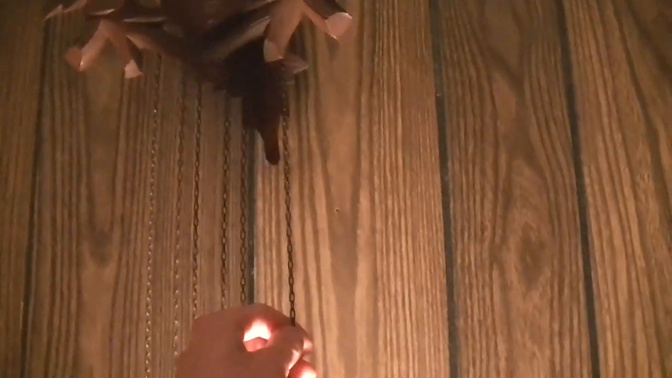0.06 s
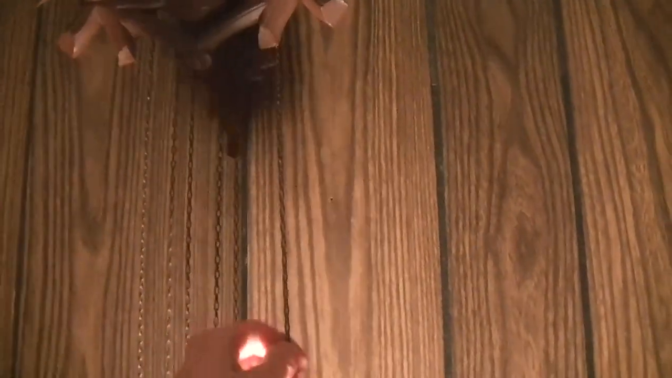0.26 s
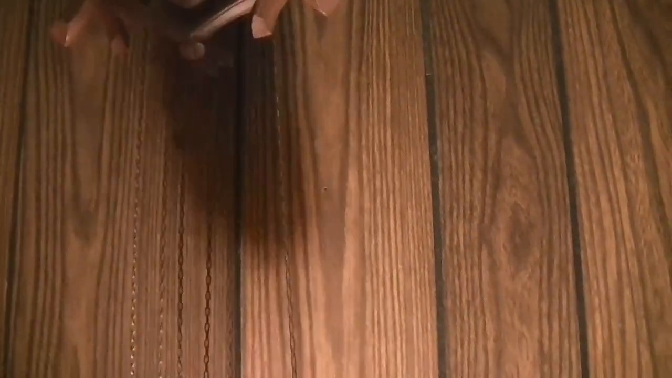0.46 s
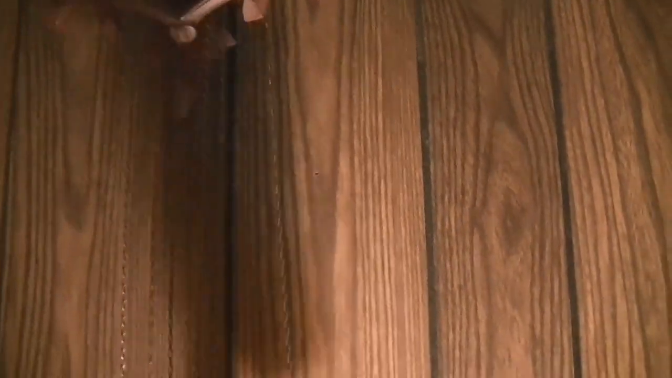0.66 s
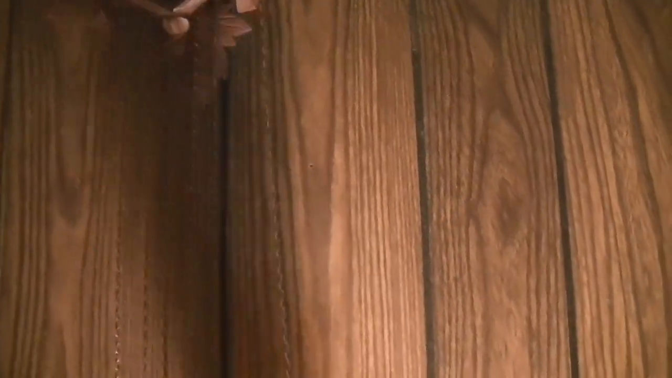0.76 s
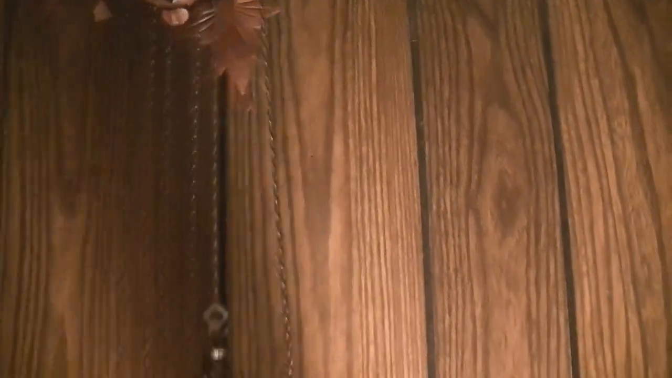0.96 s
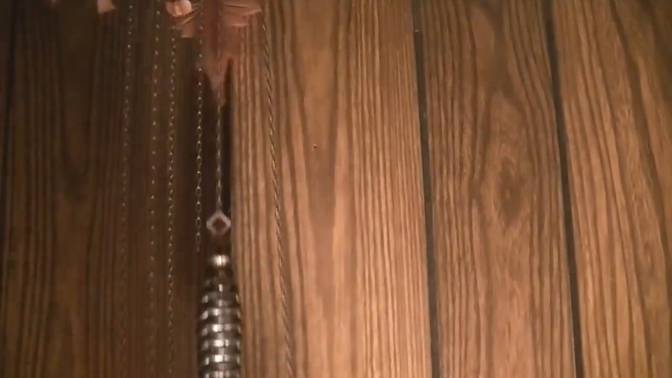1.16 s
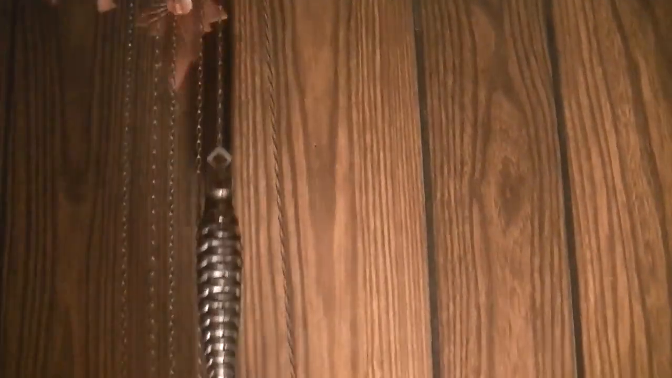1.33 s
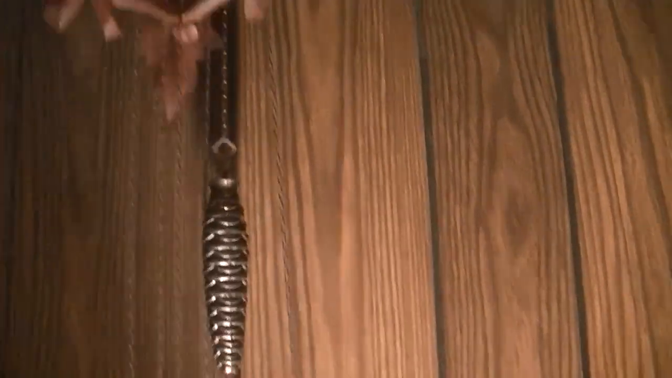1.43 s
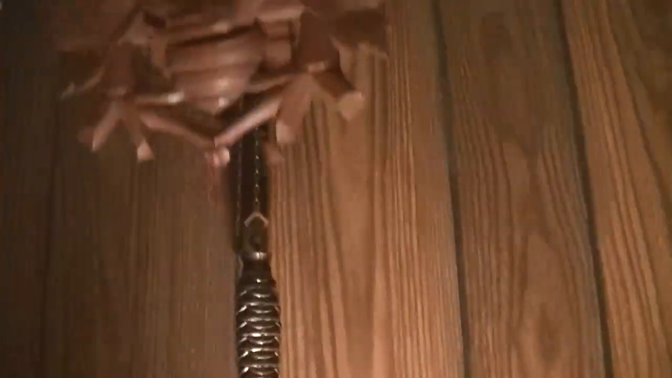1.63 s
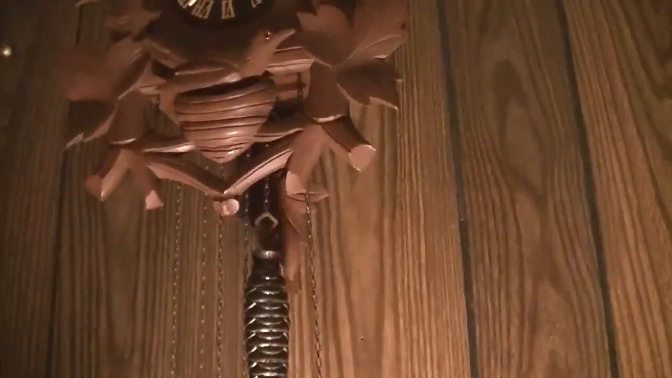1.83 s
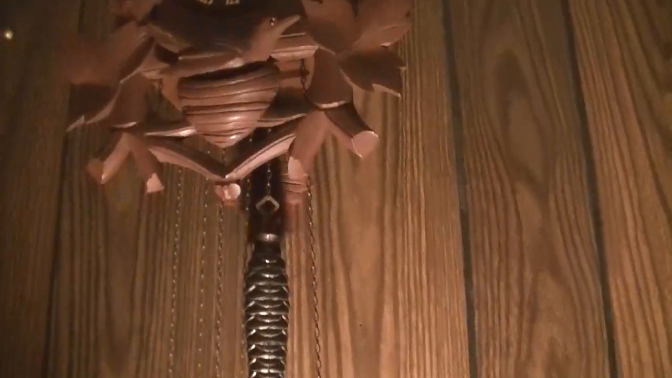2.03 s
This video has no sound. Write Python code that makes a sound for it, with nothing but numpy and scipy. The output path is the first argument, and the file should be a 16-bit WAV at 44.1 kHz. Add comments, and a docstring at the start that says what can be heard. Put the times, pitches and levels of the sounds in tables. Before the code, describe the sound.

Rapid ratchet clicking of a clock being wound by its chain, easing off into quiet

```python
"""In a small panelled room, a wall clock is wound by pulling its weight chain.
The pawl snaps over the ratchet teeth, soon at a rapid rate, then slower; decaying modes ring pawl, wheel and case.
Shaped noise bursts add metallic crack and wooden knock; short partials make the chain links clink over a rustle.
The chain tightens with a knock, clunks as it jerks and rustles softly once let go.
A short noise tail answers as the room, over still air, heard close and almost in mono."""
import sys
import numpy as np
from scipy import signal
from scipy.fft import rfft, irfft, next_fast_len
from scipy.io import wavfile
from scipy.ndimage import map_coordinates

SR = 44100
rng = np.random.default_rng(int(sys.argv[2]) if len(sys.argv) > 2 else 0)


def to_wav(s):
    """Save 16-bit WAV."""
    ch = np.atleast_2d(s).T  # columns
    pcm = np.round(np.clip(ch, -1, 1) * 32767)  # PCM
    wavfile.write(sys.argv[1], SR, pcm.astype(np.int16))


N = 92610
TOP_HZ = 16000
RING_S = np.arange(SR // 5) / SR  # time axis of one struck sound
CHATTER_S = 0.0021
MODE_SCATTER_DB, CASE_DETUNE = 2.5, 0.008  # detune as a fraction of the pitch
CASE_ATTACK_S = 0.0045

# pawl snaps: start_s [s], pawl_db [dB], pawl_pitch_hz [Hz], crack_db [dB], case_db [dB]
TOOTH_SNAPS = [(0.214, -15.5, 2540, -25.5, -30.5), (0.2588, -11.5, 2680, -24.5, -30.5),
               (0.2905, -18, 2640, -23.5, -29), (0.3134, -15, 2700, -25, -29.5),
               (0.3322, -14.5, 2780, -21, -34.5), (0.349, -20, 2480, -23, -29),
               (0.3624, -16, 2660, -25, -24.5), (0.3765, -14, 2420, -20, -26),
               (0.3904, -14, 2460, -20, -27), (0.403, -19, 2600, -21, -27.5),
               (0.4169, -19, 2400, -20.5, -27.5), (0.4308, -12.5, 2580, -22, -26.5),
               (0.444, -20, 2540, -22.5, -27), (0.4579, -21, 2450, -27.5, -29),
               (0.472, -18.5, 2460, -21, -26.5), (0.4868, -15.5, 2660, -25, -29),
               (0.5035, -31, 2460, -23, -26), (0.5207, -18.5, 2680, -23.5, -33),
               (0.5349, -21, 2800, -21.5, -28.5), (0.5499, -18, 2540, -24, -35),
               (0.562, -17.5, 2670, -22.5, -26.5), (0.576, -17, 2390, -19.5, -28),
               (0.5882, -18, 2510, -21, -25), (0.6046, -18, 2620, -20, -30.5),
               (0.616, -18.5, 2490, -20.5, -29), (0.6311, -14, 2800, -24.5, -28.5),
               (0.6433, -14.5, 2660, -21.5, -31), (0.6571, -23, 2380, -23.5, -27),
               (0.6718, -11, 2670, -24, -27), (0.6873, -14, 2780, -20, -29), (0.703, -20, 2580, -26, -27),
               (0.7195, -13.5, 2750, -22, -30), (0.7341, -13, 2850, -20, -34),
               (0.7488, -17, 2610, -26, -26), (0.7613, -17, 2620, -21.5, -27),
               (0.7763, -14.5, 2450, -20, -29.5), (0.7891, -17, 2400, -19.5, -32),
               (0.8044, -15.5, 2750, -21, -29), (0.8192, -19, 2320, -22, -31),
               (0.8361, -17.5, 2590, -21.5, -26), (0.8508, -17, 2790, -25, -30),
               (0.8678, -20.5, 2350, -22, -26.5), (0.885, -23, 2750, -25, -27),
               (0.9045, -13, 2670, -23.5, -31), (0.9287, -29, 2540, -22.5, -28.5),
               (0.9529, -15.5, 2720, -25.5, -29), (0.9763, -17.5, 2850, -21.5, -26),
               (0.9986, -27, 2570, -26, -37), (1.0182, -20, 2420, -22, -25), (1.0399, -14, 2580, -21, -30),
               (1.059, -18, 2310, -23, -28.5), (1.0794, -17.5, 2640, -22.5, -26.5),
               (1.0951, -19, 2380, -21.5, -32), (1.1142, -15, 2600, -24.5, -27),
               (1.1306, -20, 2540, -23.5, -27), (1.1487, -20.5, 2480, -22, -28),
               (1.1671, -16.5, 2660, -24.5, -26.5), (1.189, -15.5, 2600, -21.5, -32),
               (1.2126, -21, 2580, -24.5, -28.5), (1.2356, -15.5, 2720, -24, -26),
               (1.255, -17, 2700, -25.5, -30), (1.2746, -22, 2520, -24, -27.5),
               (1.291, -33, 2560, -20.5, -24.5), (1.3099, -27, 2360, -22.5, -25),
               (1.3262, -23, 2400, -20, -26.5), (1.3439, -18.5, 2590, -24, -28),
               (1.3615, -20, 2400, -19.5, -25.5), (1.3806, -16, 2540, -22.5, -31.5),
               (1.3987, -17.5, 2710, -24, -29), (1.4194, -18.5, 2430, -22.5, -26.5),
               (1.4434, -14, 2560, -24.5, -31), (1.4721, -16, 2750, -25.5, -32),
               (1.5114, -20, 2730, -25.5, -27), (1.552, -16, 2760, -25.5, -29.5),
               (1.5812, -17, 2770, -23.5, -27.5), (1.6093, -23, 2420, -24, -28),
               (1.63, -22, 2720, -24, -24.5), (1.654, -21, 2430, -22.5, -27),
               (1.6763, -19, 2410, -21.5, -28.5), (1.7011, -18, 2520, -21.5, -26.5),
               (1.7245, -21, 2660, -21.5, -27), (1.7525, -17, 2640, -21, -27.5),
               (1.7792, -21, 2670, -24, -28.5), (1.8179, -20.5, 2450, -23.5, -29)]
# modes of the wooden case and the frame in it: pitch_hz [Hz], level_db [dB], t60_s [s]
CASE_MODES = [(402.7, -20.5, 0.15), (889, -5, 0.065), (1223, -8.5, 0.07), (1804, 6, 0.028),
              (1878, 6, 0.0083), (3096, -1.5, 0.043), (3430, 2.5, 0.029)]
# dense ringing of the boards: frequency_hz [Hz], relative density_db [dB per Hz]
BOARD_COLOUR = [(30, -24), (150, -54), (225, -7), (330, -8), (520, -19), (630, -7), (850, 3), (1400, 2),
                (1700, -6), (3000, -2), (5000, -9), (15000, -22.5)]
# spectrum of the scraping links: frequency_hz [Hz], relative density_db [dB per Hz]
SCRAPE_COLOUR = [(100, -63), (450, -21.5), (850, -2.5), (1150, -7.5), (2600, -8), (4000, -16.5),
                 (5500, -15.5), (15000, -31)]
# loudness of the running chain: time_s [s], level_db [dB]
CHAIN_LEVEL = [(0, -57), (.1, -52.5), (.17, -50.5), (.21, -43), (.35, -38), (.8, -37), (1.45, -43.5),
               (1.52, -49), (1.8, -41), (1.87, -71), (2.1, -59)]


def amp(db):
    """Decibels to gain."""
    return 10 ** (np.asarray(db) / 20)


def unit(x):
    """Scale to rms 1."""
    return x / np.sqrt(np.mean(x ** 2) + 1e-20)


def along(points, hz):
    """Interpolate (Hz, value) points on a log frequency axis."""
    point_hz, value = np.transpose(points)
    return np.interp(np.log(hz + 1), np.log(point_hz + 1), value)


def level_at(points, s):
    """Gain at a time, from (s, dB) points."""
    return amp(np.interp(s, *np.transpose(points)))


def filtered(x, response):
    """Multiply the spectrum of x by a response of frequency."""
    size = next_fast_len(N + SR // 2)
    return irfft(rfft(x, size) * response(np.fft.rfftfreq(size, 1 / SR)), size)[..., :N]


def noise(colour):
    """Steady coloured noise of rms 1."""
    return unit(filtered(rng.standard_normal(N), lambda hz: amp(along(colour, hz))))


def add(track, s, sound):
    """Mix a sound into the track at a time."""
    part = track[max(round(s * SR), 0):][:len(sound)]
    part += sound[:len(part)]


def decay(t, t60):
    """Exponential fall by 60 dB in t60 seconds."""
    return np.exp(-np.log(1000) * t / t60)


def envelope(attack, t60):
    """A quick rise, a hold while the contact chatters, and an exponential fall."""
    return (1 - np.exp(-RING_S / attack)) * decay(np.maximum(RING_S - CHATTER_S, 0), t60)


def ring(modes, attack, stretch=1, scatter_db=0, detune=0):
    """A struck body: decaying modes of alternating sign, optionally scattered in level and pitch."""
    out = np.zeros(len(RING_S))
    for k, (hz, db, t60) in enumerate(modes):
        gain = (-1) ** k * amp(db + scatter_db * rng.normal())
        pitch_hz = hz * stretch * (1 + detune * rng.normal())
        out += gain * envelope(attack, t60) * np.sin(2 * np.pi * pitch_hz * RING_S)
    return out


def burst(colour, attack, t60, count=3):
    """A body with many close modes: dying noise, pulled back to its colour on every pass."""
    gain = amp(along(colour, np.fft.rfftfreq(len(RING_S), 1 / SR)))
    shape = envelope(attack, t60)
    x = shape * unit(irfft(gain * rfft(rng.standard_normal(len(RING_S)))))
    for _ in range(count):
        phase = np.angle(rfft(x))
        x = irfft(gain * np.exp(1j * phase)) * np.sqrt(shape)
    return unit(x) * np.sqrt(np.mean(shape ** 2))


def clouds(colour, attack, t60, fresh):
    """One burst per tooth: a share of its power is fresh, the rest repeats the same ringing."""
    same = burst(colour, attack, t60)
    return [np.sqrt(1 - fresh) * same + np.sqrt(fresh) * burst(colour, attack, t60, count=1)
            for _ in TOOTH_SNAPS]


def pawl(pitch_hz):
    """The pawl drops off a tooth; all its modes follow the pitch of the snap."""
    # pawl modes at the reference pitch: pitch_hz [Hz], level_db [dB], t60_s [s]
    pawl_modes = [(2406, -8.5, 0.013), (2684, 0, 0.008), (2766, -10.5, 0.031)]
    reference_hz = 2637
    return ring(pawl_modes, 0.00095, pitch_hz / reference_hz)


def wheel():
    """The struck ratchet wheel rings in high modes that vary a little with each snap."""
    # ratchet wheel modes: pitch_hz [Hz], level_db [dB], t60_s [s]
    wheel_modes = [(4478, -12.5, 0.053), (4848, -23, 0.09), (5225, -3.5, .013), (5620, -14.5, .04),
                   (6035, -7, 0.026), (7290, -16.5, 0.029), (8180, -23, 0.036), (10138, -12.5, 0.03),
                   (11950, -13.5, 0.021), (13100, -13, .025), (14150, -25, .018)]
    return ring(wheel_modes, 0.00032, scatter_db=3, detune=0.005)


def metal_cracks():
    """Dense ringing of the metal parts, half of its power new on each tooth."""
    # metal crack spectrum: frequency_hz [Hz], relative density_db [dB per Hz]
    crack_colour = [(500, 0.5), (1500, -6), (2500, -0.5), (3400, 4), (3900, -10.5), (5000, -0.5),
                    (6400, -3.5), (8000, -10), (9700, -3), (10700, -2), (11500, -8.5), (12500, -13.5),
                    (15800, -19.5)]
    return clouds(crack_colour, attack=0.0003, t60=0.031, fresh=0.5)


def recoloured(x):
    """Each tooth colours its crack with random smooth bumps in the spectrum."""
    bump_db, spacing_hz = 2.3, 1100
    position = np.fft.rfftfreq(len(x), 1 / SR) / spacing_hz
    bumps = map_coordinates(rng.standard_normal(len(x)), [position], mode="wrap")
    coloured = irfft(rfft(x) * unit(amp(bump_db * bumps)))
    return coloured * (RING_S < RING_S[-1] / 2)  # drop what the filter wraps to the end


def ratchet():
    """The pawl drops off each tooth and rings itself, the wheel and the case."""
    jitter_s, case_delay_s = 0.00005, 0.001995  # small random timing scatter; lag of the case modes
    crack_trim_db, knock_trim_db = -0.5, 1
    metal, wood = np.zeros((2, N))
    cracks = metal_cracks()
    knocks = clouds(BOARD_COLOUR, attack=0.0048, t60=0.06, fresh=1)
    for (s, pawl_db, pitch_hz, crack_db, case_db), crack, knock in zip(TOOTH_SNAPS, cracks, knocks):
        at = s + jitter_s * rng.normal()
        add(metal, at, amp(pawl_db) * pawl(pitch_hz))
        add(metal, at, amp(crack_db) * (wheel() + amp(crack_trim_db) * recoloured(crack)))
        add(wood, at, amp(case_db + knock_trim_db) * knock)
        case = ring(CASE_MODES, CASE_ATTACK_S, scatter_db=MODE_SCATTER_DB, detune=CASE_DETUNE)
        add(wood, at + case_delay_s, amp(case_db) * case)
    # keep the pawl, wheel and crack sounds free of low thump
    thump_cut = signal.butter(3, 900, "highpass", fs=SR, output="sos")
    return signal.sosfilt(thump_cut, metal) + wood


def clink(count=6):
    """One link strikes the next: a few short partials, pitched anew by each contact."""
    centre_hz, spread_oct, t60_s = 4740, 0.5, 0.0058
    octaves = spread_oct * rng.standard_normal((count, 1))
    hz = np.minimum(centre_hz * 2 ** octaves, TOP_HZ)
    partials = np.sin(2 * np.pi * (hz * RING_S + rng.random((count, 1))))
    return partials.sum(0) * 2 / np.sqrt(count) * decay(RING_S, t60_s)


def chain_rustle():
    """The running chain scrapes in uneven grains, louder as the pawl rides up each tooth."""
    grain_db, grains_per_s, ride_db = 4.5, 400, 6
    t = np.arange(N) / SR
    grains = map_coordinates(rng.standard_normal(N // 10), [t * grains_per_s], mode="wrap")
    snap_s = [row[0] for row in TOOTH_SNAPS]
    up_tooth = np.interp(t, snap_s, np.arange(len(snap_s))) % 1  # 0 to 1 between snaps
    scrape = noise(SCRAPE_COLOUR) * amp(grain_db * grains + ride_db * up_tooth)
    return level_at(CHAIN_LEVEL, t) * unit(scrape)


def chain_ticks():
    """Many small link contacts at random times, following the level of the running chain."""
    ticks_per_s, tick_db, scatter_db = 130, -1, 3.2
    out = np.zeros(N)
    for s in rng.random(round(ticks_per_s * N / SR)) * N / SR:
        gain = level_at(CHAIN_LEVEL, s) * amp(tick_db + scatter_db * rng.normal())
        add(out, s, gain * clink())
    return out


def link_clinks():
    """Single links clink audibly between the snaps and set the case ringing."""
    # single clinks: start_s [s], level_db [dB]
    clink_events = [(0.124, -53), (0.136, -45), (0.164, -45), (0.236, -36), (0.25, -39), (0.274, -30.5),
                    (.321, -23.5), (0.469, -32), (.558, -23.5), (.651, -44), (0.895, -46), (1.054, -37),
                    (1.181, -42), (1.198, -37), (1.284, -31), (1.391, -43), (1.466, -27.5), (1.494, -34.5),
                    (1.603, -38), (1.665, -30), (1.746, -35), (1.765, -35)]
    case_db = -4
    out = np.zeros(N)
    for s, db in clink_events:
        case = ring(CASE_MODES, CASE_ATTACK_S, detune=CASE_DETUNE)
        add(out, s, amp(db) * (clink() + amp(case_db) * case))
    return out


def slack_knock():
    """The hand takes up the slack: the chain knocks in its guide and scrapes."""
    # modes of the chain guide: pitch_hz [Hz], level_db [dB], t60_s [s]
    guide_modes = [(845, -2.5, 0.17), (1887, 6, 0.038), (2450, -5, 0.057), (4770, -10, 0.33)]
    start_s, level_db, scrape_db, attack_s = 0.052, -40, 8, 0.006
    out = np.zeros(N)
    scrape = amp(scrape_db) * burst(SCRAPE_COLOUR, attack_s, t60=0.076)
    add(out, start_s, amp(level_db) * (ring(guide_modes, attack_s) + scrape))
    return out


def chain_clunks():
    """Jerks of the chain shake the frame into dull modes and a clatter of the boards."""
    # modes of the jerked frame: pitch_hz [Hz], level_db [dB], t60_s [s]
    frame_modes = [(487, -7, 0.022), (1070, -8, 0.022), (1335, -1, 0.016), (1540, -4.5, 0.019),
                   (2650, -0.5, 0.0032)]
    # jerks of the chain: start_s [s], level_db [dB]
    jerk_events = [(.38, -35), (0.578, -30), (0.593, -37), (0.781, -27.5), (.793, -28), (1.05, -30),
                   (1.31, -32.5), (1.382, -34), (1.542, -26), (1.565, -34.5), (1.644, -31), (1.666, -29)]
    attack_s, clatter_db = 0.00024, -4.5
    out = np.zeros(N)
    for s, db in jerk_events:
        clatter = amp(clatter_db) * burst(BOARD_COLOUR, attack_s, t60=0.019)
        frame = ring(frame_modes, attack_s, scatter_db=MODE_SCATTER_DB, detune=CASE_DETUNE)
        add(out, s, amp(db) * (frame + clatter))
    return out


def settling():
    """Coloured noise fades in as a soft rustle once the chain is let go."""
    # loudness of the soft rustle: time_s [s], level_db [dB]
    settle_level = [(1.7, -75), (1.82, -55.5), (2.1, -55.5)]
    # its spectrum: frequency_hz [Hz], relative density_db [dB per Hz]
    settle_colour = [(130, -37), (400, -4.5), (1000, 0), (1300, 5), (1600, -6.5), (2400, -4.5), (5000, -27),
                     (15000, -40)]
    return level_at(settle_level, np.arange(N) / SR) * noise(settle_colour)


def chain():
    """All contacts of the chain: the first knock, the run with its jerks, and the settling."""
    running = chain_rustle() + chain_ticks() + link_clinks()
    return slack_knock() + running + chain_clunks() + settling()


def radiated(x):
    """The small case gives off little bass and has a hollow between its lowest modes."""
    leak_db = -16.5  # what also passes unfiltered
    bass_cut = signal.butter(5, 140, "highpass", fs=SR, output="sos")
    hollow = signal.iirnotch(506, 4.4, fs=SR)  # antiresonance: Hz, Q
    return signal.lfilter(*hollow, signal.sosfilt(bass_cut, x)) + amp(leak_db) * x


def room(x):
    """The panelled room's short noise tail builds up gradually and decays by frequency."""
    # reverberation time: frequency_hz [Hz], t60_s [s]
    room_t60 = [(200, 0.21), (600, .5), (1500, 0.051), (4000, 0.2), (12000, 0.078)]
    delay_s, rise_s = 0.011, 0.004
    hz, t, spectrum = signal.stft(rng.standard_normal(SR // 2), SR, nperseg=256)
    shape = (1 - np.exp(-t / rise_s)) * decay(t, along(room_t60, hz)[:, None])
    tail = signal.istft(spectrum * shape, SR, nperseg=256)[1]
    delayed = np.pad(x, (round(delay_s * SR), 0))
    return signal.fftconvolve(delayed, tail / np.linalg.norm(tail))[:N]


def still_air():
    """The quiet background is steady coloured noise."""
    # air spectrum: frequency_hz [Hz], relative density_db [dB per Hz]
    air_colour = [(25, -29), (60, -7), (130, -18), (230, -7), (400, -0.5), (650, -3.5), (1290, -9.5),
                  (2400, -9), (4000, -13), (6000, -17.5), (9000, -22)]
    return amp(-54) * noise(air_colour)


def scene():
    """Clock, room and still air, with only a trace of width."""
    # stereo width: frequency_hz [Hz], side_db [dB]
    side_level = [(400, -24), (1100, -54), (2500, -27.5), (14000, -29.5)]
    clock = radiated(ratchet() + chain())
    mid = clock + amp(-15.5) * room(clock) + still_air()
    # the side has its own, stronger room and its own air, turned by a quarter cycle
    side_source = clock + amp(-2.0) * room(clock) + still_air()
    side = filtered(side_source, lambda hz: 1j * amp(along(side_level, hz)))
    return np.array([amp(0.07) * (mid + side), mid - side])


def record(dry):
    """Keep nothing above the band limit."""
    return filtered(dry, lambda hz: hz < TOP_HZ)


dry = scene()
out = record(dry)
to_wav(out)
```